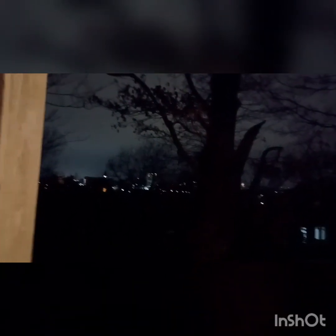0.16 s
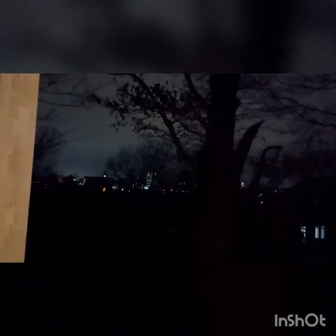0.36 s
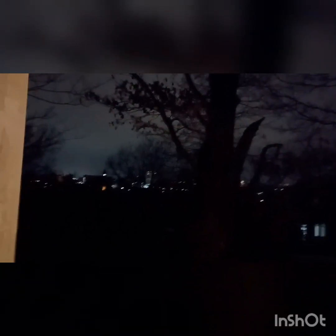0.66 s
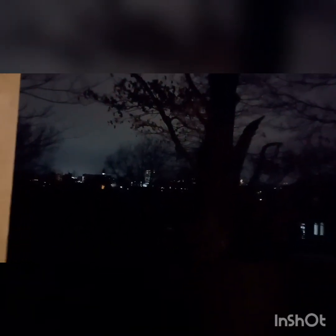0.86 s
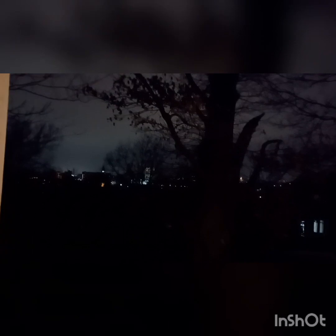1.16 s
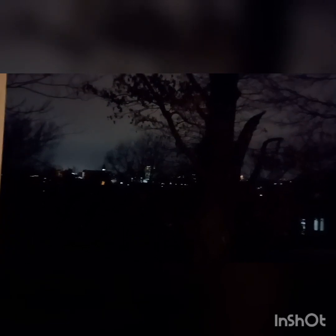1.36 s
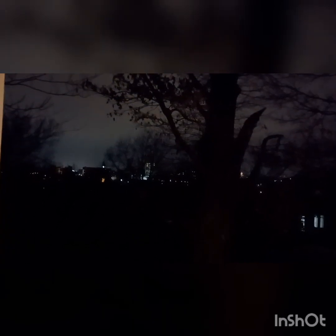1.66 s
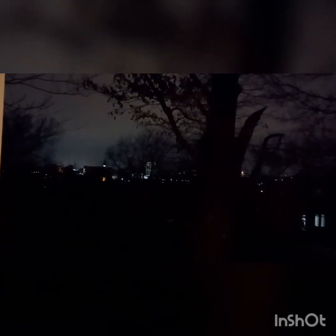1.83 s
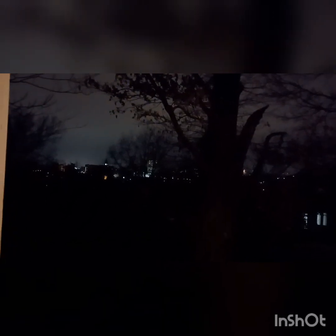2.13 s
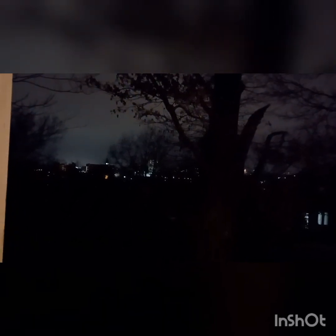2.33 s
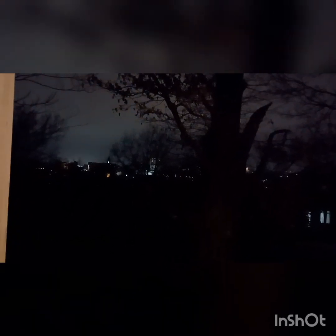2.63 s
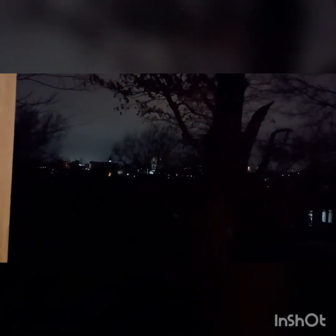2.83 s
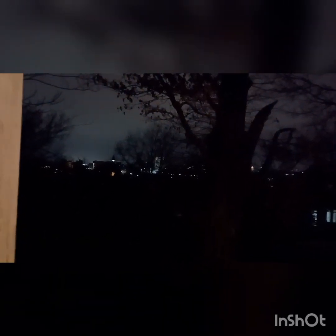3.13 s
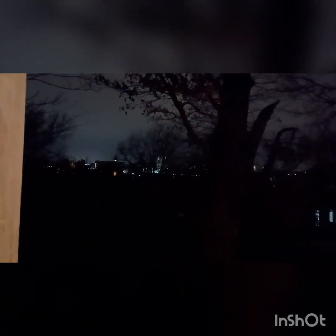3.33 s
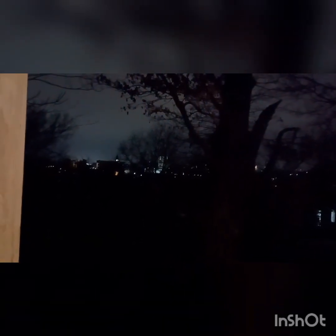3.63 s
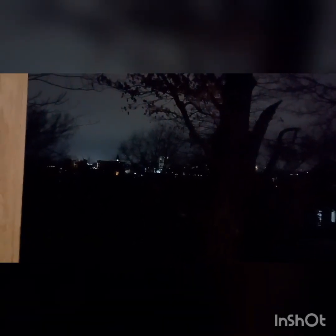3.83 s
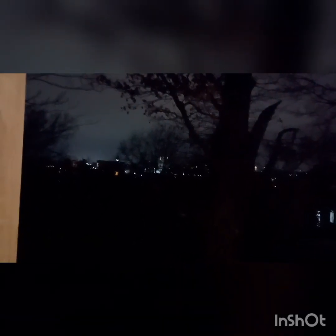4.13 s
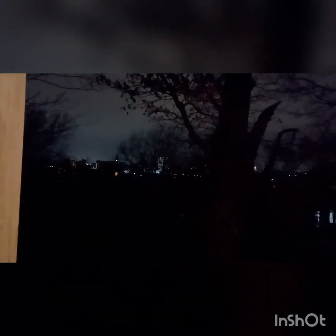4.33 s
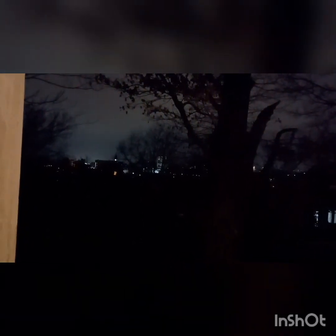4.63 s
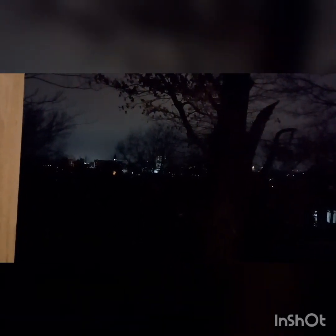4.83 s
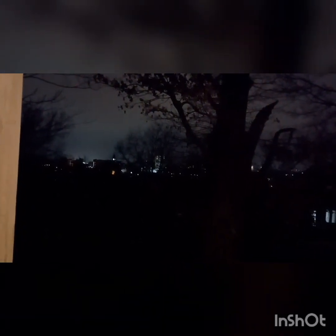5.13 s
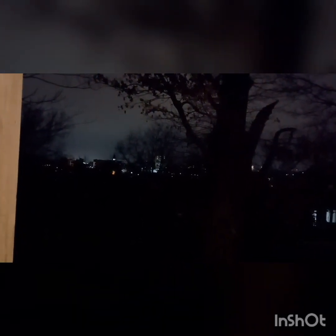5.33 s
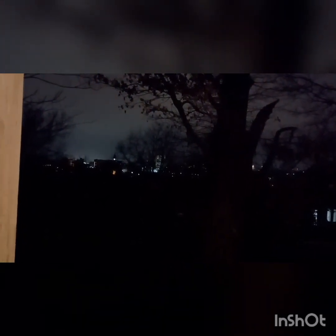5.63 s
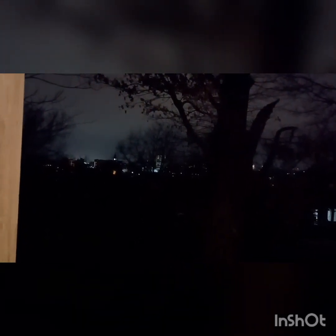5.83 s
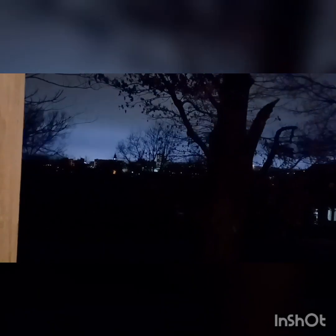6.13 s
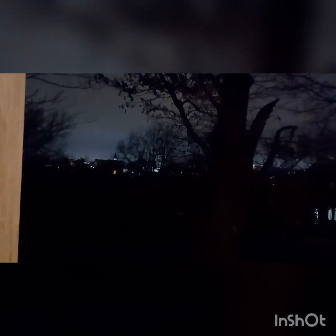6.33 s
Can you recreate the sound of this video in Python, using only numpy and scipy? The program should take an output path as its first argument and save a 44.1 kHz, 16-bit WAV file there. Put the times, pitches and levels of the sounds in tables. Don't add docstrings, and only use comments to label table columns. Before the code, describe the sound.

Night rain heard from a doorway: steady hiss on trees and roofs with a few close drip ticks. Faint rumble for over a second, then thunder swells in lumpy, deep rolls, peaking in a sharp double clap before three seconds. It sinks to a lull, returns with heavy booms, and is still rumbling strongly at the end. Phone microphones, stereo, with the rain dipping as gain drops.

```python
import sys
import numpy as np
from scipy import signal
from scipy.fft import rfft, irfft
from scipy.io import wavfile
from scipy.ndimage import uniform_filter1d, minimum_filter1d

SR = 44100
rng = np.random.default_rng(int(sys.argv[2]) if len(sys.argv) > 2 else 0)


def inscribe(sig):
    pcm = np.round(np.clip(np.atleast_2d(sig).T, -1, 1) * 32767)
    wavfile.write(sys.argv[1], SR, pcm.astype(np.int16))


def volts(x):
    e = np.asarray(x, float) / 20
    return 10 ** e


N = 286209
HZ = np.maximum(np.arange(N // 2 + 1) * SR / N, 1)


def rms_one(x):
    return x / np.sqrt(np.mean(x ** 2) + 1e-20)


def at_hz(points):
    hz, value = np.transpose(points)
    return np.interp(np.log(HZ), np.log(hz), value)


def drift(rate):
    pole = np.exp(-80 * np.pi * rate / SR)
    noise = rng.standard_normal(N // 40 + 2002)
    slow = signal.lfilter([1], [1, -2 * pole, pole * pole], noise)[2000:]
    return np.interp(np.arange(N) / 40, np.arange(len(slow)), rms_one(slow))


def grains(per_s, spread_db):
    excess = np.minimum(rng.exponential(1, (2, N)), 5)
    sizes = volts(spread_db * excess) * rng.choice([-1, 1], (2, N))
    return rms_one(sizes * (rng.random((2, N)) < per_s / SR))


def stereo_bins(pair, spectrum, likeness):
    mid, side = rfft(pair) * volts(at_hz(spectrum))
    alike = np.clip(at_hz(likeness), -1, 1)
    return np.sqrt(1 + alike) * mid + np.sqrt(1 - alike) * side * [[1], [-1]]


def zone(centres_hz, k):
    return np.interp(np.log(HZ), np.log(centres_hz), np.arange(len(centres_hz)) == k)


# t/s, step/dB, settling time/s
GAIN_STEPS = [
    (2.21, -2, .012),
    (2.5, -2.5, .2),
    (2.755, -6.5, 0.017),
    (2.83, 4.5, .15),
    (4.09, 4.5, .04),
    (4.3, -1.1, 0.33),
    (5.2, -2.5, 0.012),
    (5.95, 0.9, 0.088),
    (6.2, -2.1, .05),
    (6.33, 2, .12),
]


def stepped_gain_db():
    t, gain_db = np.arange(N) / SR, 0
    for s, step_db, settle_s in GAIN_STEPS:
        age = np.maximum(t - s, 0)
        gain_db = gain_db + step_db * (1 - np.exp(-age / max(settle_s, .003)))
    return gain_db


# f/Hz, level/dB
RAIN = [(260, -43.5), (480, 0), (1000, 0), (1400, -5), (2200, -4.5), (2800, -10), (5000, -8), (6900, -10),
        (7700, -18.5), (8600, -19.5), (10500, -15.5), (13000, -10), (15000, -14), (15800, -15)]
# f/Hz, likeness (-1 to 1)
RAIN_ALIKE = [(400, .6), (900, 0.14), (1400, -0.21), (3000, -0.067), (15000, -0.018)]
# f/Hz, left over right level/dB
RAIN_PAN = [(500, 1.5), (8000, 1), (13000, -0.3)]


def rain():
    patter = rng.standard_normal((2, N)) + volts(-10.5) * grains(900, spread_db=5.0)
    bins = stereo_bins(patter, RAIN, RAIN_ALIKE) * volts(at_hz(RAIN_PAN) * [[.5], [-.5]])
    treble_rms = np.sqrt(np.mean(irfft(bins * (HZ > 3000), N) ** 2))
    gust, spatter, out = drift(3.6), drift(30), 0
    centres_hz = np.geomspace(500, 14000, num=6)
    for k, hz in enumerate(centres_hz):
        near = (hz / 14000) ** 0.83
        flicker_db = .15 * gust + (1.03 + 1.1 * near) * drift(22) + 0.56 * near * spatter
        out = out + volts(flicker_db) * irfft(bins * zone(centres_hz, k), N)
    return volts(-52.5 + stepped_gain_db()) * out / treble_rms


# t/s, peak level/dB, left over right level/dB
DROPS = [(0.3646, -42, 1.5), (0.5581, -44, 0.5), (0.7821, -46.5, 5.5), (1.0844, -50.5, -2.5),
         (1.2471, -43.5, 4), (1.493, -48, -2), (1.5843, -49, -7), (1.73, -46, 2.5), (1.8997, -45, -1),
         (2.1929, -49, 0), (2.702, -48, 2.5), (4.4099, -48.5, 4), (4.5176, -48.5, -1), (4.7616, -52.5, 3.5)]


def drops():
    out, t = np.zeros((2, N + SR)), np.arange(SR // 40) / SR
    noise = rng.standard_normal((len(DROPS), 2, len(t)))
    for (s, peak_db, pan_db), splash in zip(DROPS, noise):
        gain = volts(peak_db - 2 + np.array([[pan_db], [-pan_db]]) / 2)
        out[:, round(s * SR):][:, :len(t)] += gain * splash * volts(-60 * t / 0.025)
    treble = signal.butter(2, 3500, "high", fs=SR, output="sos")
    return signal.sosfilt(treble, out[:, :N])


def evened(x, window_s, share):
    power = uniform_filter1d(np.mean(x ** 2, axis=0), size=round(window_s * SR))
    return x * (np.mean(power) / (power + 1e-20)) ** (share / 2)


def resonances(modes):
    return volts(sum(db / (1 + (2 * (HZ - hz) / width_hz) ** 2) for hz, width_hz, db in modes))


# t/s, peak level/dB, t60/s, rise/s
SURGES = [(1.759, -29, 0.4, .01), (1.932, -24.5, 0.93, 0.0047), (1.99, -30, .6, .02),
          (2.129, -44, 0.28, .004), (2.411, -37.5, 0.4, .004), (2.5, -22.5, 0.47, 0.01),
          (2.56, -30, .4, .015), (2.642, -15.5, 0.19, .004), (2.76, -18, 0.49, 0.0024),
          (2.84, -28, .5, .02), (3.679, -45, 0.32, .003), (3.84, -35, 0.29, .003), (4.189, -48, 0.25, .004),
          (4.216, -36, .3, .003), (4.28, -35, .3, .004), (4.55, -30, 0.15, .004), (4.73, -26.5, 0.34, .01),
          (4.922, -39.5, 0.27, .004), (5.11, -19.5, 0.57, 0.034), (5.17, -9.5, 0.37, 0.013),
          (5.199, -14.5, 0.12, 0.0023), (5.338, -26, 0.18, .003), (6.041, -22, 0.49, 0.0062),
          (6.09, -30, .5, .015), (6.252, -45.5, 0.24, .004), (6.328, -23, 0.32, .01),
          (6.385, -27, 0.54, .015)]


def surge_shape():
    t, power = np.arange(N) / SR, 1e-20
    for s, peak_db, t60, rise_s in SURGES:
        age = np.maximum(t - s, 0)
        swell = 1 - np.exp(-age / max(rise_s, .002))
        power = power + (volts(peak_db - 10 - 60 * age / max(t60, .03)) * swell) ** 2
    return np.sqrt(power)


# t/s, level/dB, nearness/dB (above 0 near and bright, below 0 far and deep)
ROLL = [(0, -38.5, -4), (1.2, -39, -4), (1.34, -32, -4.5), (1.7, -32, -7), (1.95, -27, -1.8),
        (2.11, -37, 2), (2.17, -20.5, -2.2), (2.9, -22.5, 7), (2.97, -27, 3.5), (3.2, -34.5, 4),
        (3.64, -35, 2), (4.17, -31.5, -0.3), (4.45, -23, -1.5), (5.1, -21, -2.5), (5.6, -25, -1.5),
        (6.02, -25, -1), (6.08, -19, -0.3), (6.49, -16, -1.8)]
# t of the top/s, level/dB, nearness/dB, length/s
PEALS = [(4.201, -30, 3.5, 0.071), (2.054, -32, 6.5, 0.036), (1.407, -29, -7.5, 0.076),
         (1.543, -29.5, -10, 0.07), (1.721, -27, -6, 0.062), (1.832, -29.5, 2.5, 0.088),
         (1.96, -35.5, -6, 0.16), (2.196, -19.5, 1.5, 0.14), (2.206, -23, -5, 0.056),
         (2.323, -19, 1, 0.035), (2.459, -19, 0, 0.054), (2.644, -21, 6, 0.11), (2.76, -15.5, 11.5, 0.03),
         (2.879, -23, 6.5, 0.059), (3.684, -28, 0.5, 0.042), (3.752, -37, -15.5, 0.029),
         (3.867, -30.5, -8, 0.058), (3.94, -30.5, -7.5, 0.044), (6.472, -14.5, -3.5, 0.075),
         (4.41, -31, -10, 0.099), (4.551, -15, -3.5, 0.026), (4.658, -22, -9, 0.028),
         (4.734, -21.5, -1, 0.036), (4.818, -20, -7, 0.037), (5.078, -28, 4, 0.026),
         (5.195, -14.5, 3.5, 0.056), (5.306, -22.5, -3, 0.044), (5.482, -25, -2.5, 0.064),
         (5.817, -27, -11.5, 0.046), (6.371, -22, 7, 0.042)]
ZONE_FOLLOWS = [(-1.13, -0.66), (-0.77, -0.13), (-0.2, 0.08), (1.4, 0.95), (2.02, 1)]


def zone_levels():
    t, every = np.arange(0, N, 32) / SR, np.arange(N) / SR
    roll_s, *curves = np.transpose(ROLL)
    level_db, near_db = [np.interp(every, roll_s, curve) for curve in curves]
    s, peal_db, peal_near_db, length_s = np.transpose(PEALS)[:, :, None]
    age = (t - s) / np.maximum(length_s, .01)
    swell = np.exp(-np.where(age < 0, age / 0.49, age) ** 2)
    for far, near in ZONE_FOLLOWS:
        steady = volts(level_db + np.where(near_db < 0, far, near) * near_db)
        peals = volts(peal_db + np.where(peal_near_db < 0, far, near) * peal_near_db) * swell
        power = steady ** 2 + np.interp(every, t, np.sum(peals ** 2, axis=0))
        yield np.minimum(np.sqrt(power), volts(-12))


ZONES_HZ = (90, 155, 240, 420, 1200)
# f/Hz, level/dB per Hz
THUNDER = [(16, -59), (28, -37), (86, -5.5), (151, -0.5), (186, -8), (225, 1.5), (299, -7), (454, -10.5),
           (593, -17), (703, -21), (866, -23), (1070, -30.5), (1310, -33), (1500, -38.5), (2600, -63.5),
           (3380, -84.5), (5720, -120)]
# f/Hz, likeness (-1 to 1)
THUNDER_ALIKE = [(60, 0.96), (250, 0.98), (600, 0.83), (1400, 0.13), (2500, 0.33)]
# f/Hz, width/Hz, level/dB
DOORWAY = [(96, 13, 6), (174, 28, 2.5), (226, 4.7, 1.5), (342, 30, 0.5), (465, 40, -1), (688, 13, 3.5),
           (850, 15, 2)]
# f/Hz, level/dB per Hz
SURGE_COLOUR = [(250, -28.5), (550, 3.5), (1000, -3.5), (1500, -13.5), (2100, -25.5), (3000, -63.5)]


def roll():
    bins = stereo_bins(grains(2500, spread_db=1.5), THUNDER, THUNDER_ALIKE) * resonances(DOORWAY)
    bins = bins / np.sqrt(np.mean(irfft(bins, N) ** 2))
    out = 0
    for k, gain in enumerate(zone_levels()):
        fronts = evened(irfft(bins * zone(ZONES_HZ, k), N), 0.13, share=0.7)
        lumps = volts(1.5 * drift(9.3))
        out = out + gain * fronts * lumps
    crackle = stereo_bins(grains(3000, spread_db=-0.5), SURGE_COLOUR, THUNDER_ALIKE)
    return out + surge_shape() * rms_one(irfft(crackle, N))


# t/s, peak level/dB, pitch f/Hz, t60/s
CLAPS = [(1.309, -21.5, 143, 0.19), (1.721, -17, 146, 0.34), (2.139, -11.5, 219, 0.066),
         (2.161, -8, 240.6, 0.075), (2.228, -25, 135.6, 0.069), (2.317, -7, 87.3, 0.085),
         (2.418, -14.5, 141.6, 0.16), (2.648, -7, 129, 0.047), (2.76, 2, 201.8, 0.06),
         (2.792, -2.5, 229.5, 0.055), (2.856, -11, 197, 0.13), (2.91, -13, 262, 0.076),
         (3.672, -12.5, 128, 0.04), (3.846, -26, 120, 0.06), (4.215, -10.5, 95, 0.059),
         (4.299, -11.5, 168.4, 0.084), (4.383, -11, 101, 0.087), (4.448, -11, 106.3, 0.41),
         (4.556, -2, 103.4, 0.12), (4.64, -10, 135, 0.05), (4.731, -10, 119, 0.08),
         (4.828, -9.5, 143, 0.048), (5.191, -3, 170.6, 0.065), (5.204, -9.5, 226.5, 0.28),
         (5.26, -12, 143, 0.044), (6.046, -19, 153, 0.06), (6.32, -14, 203, 0.19), (6.36, -19, 226.4, 0.19),
         (6.418, -7.5, 220, 0.081)]


def claps():
    out, t = np.zeros((2, N + SR)), np.arange(SR // 4) / SR
    wobble = rng.standard_normal((len(CLAPS), 3, 40))
    for (s, peak_db, hz, t60), (turns, *own) in zip(CLAPS, wobble):
        swell = 1 - np.exp(-(t * hz / 0.99) ** 2)
        shape = swell * volts(-60 * (t / max(t60, .02)) ** 1.96)
        for side in range(2):
            uneven = 0.38 * (turns - turns[0]) + 0.052 * own[side]
            phase = 2 * np.pi * hz * t + np.interp(t * hz, np.arange(40), uneven)
            front = np.sin(phase) + 0.34 * np.sin(2 * phase + 1.26)
            out[side, round(s * SR):][:len(t)] -= volts(peak_db - 5.0) * front * shape / shape.max()
    return out[:, :N]


def scene():
    lag_s, pan_db = 0.00017, 1.46
    left, right = roll() + claps()
    late = np.interp(np.arange(N) - lag_s * SR, np.arange(N), right)
    thunder = np.array([left * volts(pan_db / 2), late * volts(-pan_db / 2)])
    return thunder + rain() + drops()


def roll_off(x):
    return signal.sosfilt(signal.butter(12, 15680, fs=SR, output="sos"), x)


def record(dry):
    cut = signal.sosfilt(signal.butter(3, 55, "high", fs=SR, output="sos"), dry)
    room = np.minimum(1, .985 / (np.abs(cut).max(axis=0) + 1e-9))
    gain = uniform_filter1d(minimum_filter1d(room, size=801), size=400)
    ease = np.clip((N - np.arange(N)) / (.004 * SR), .45, 1)
    return roll_off(cut * gain * ease)


dry = scene()
out = record(dry)
inscribe(out)
```